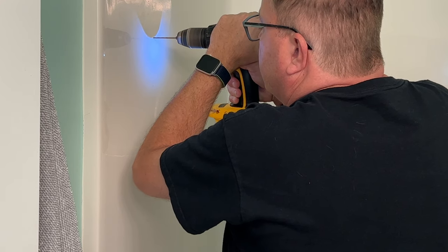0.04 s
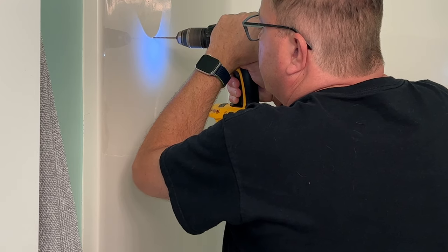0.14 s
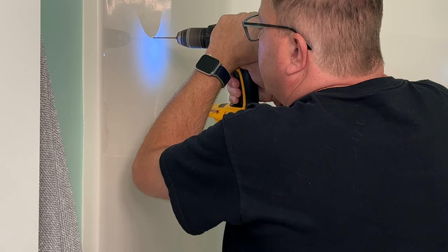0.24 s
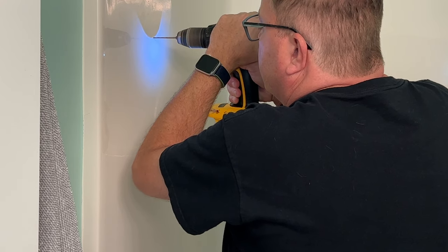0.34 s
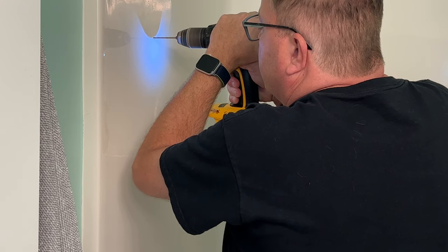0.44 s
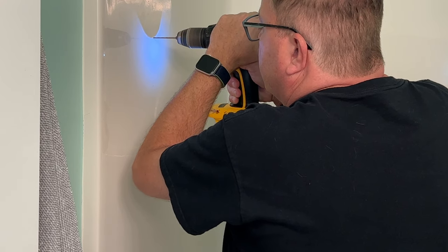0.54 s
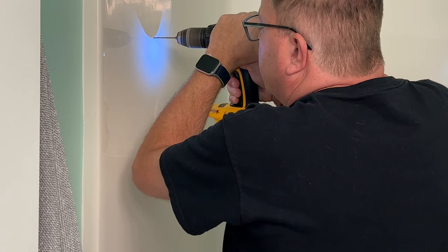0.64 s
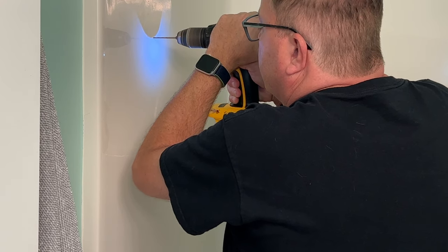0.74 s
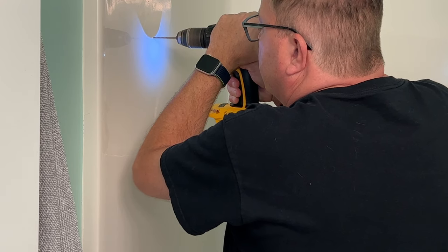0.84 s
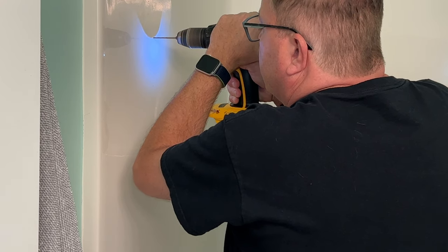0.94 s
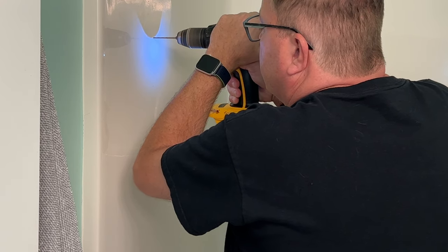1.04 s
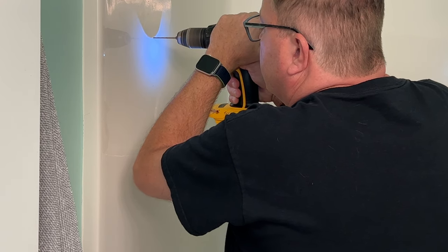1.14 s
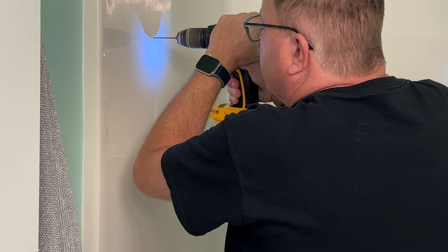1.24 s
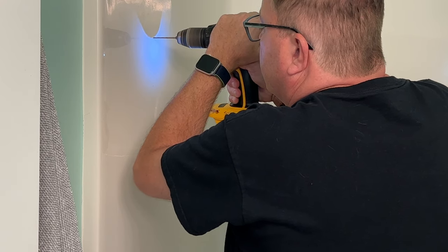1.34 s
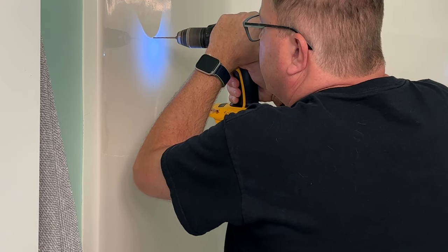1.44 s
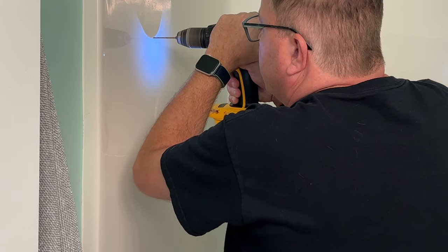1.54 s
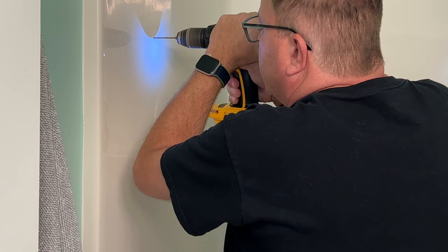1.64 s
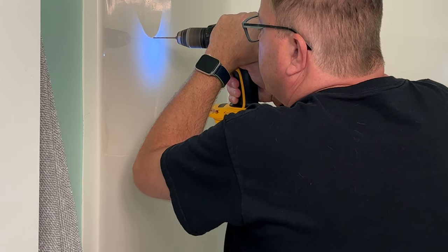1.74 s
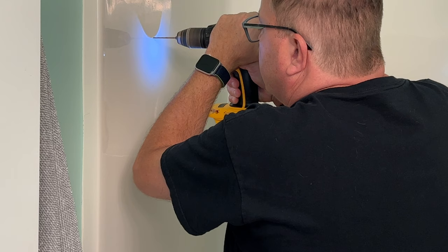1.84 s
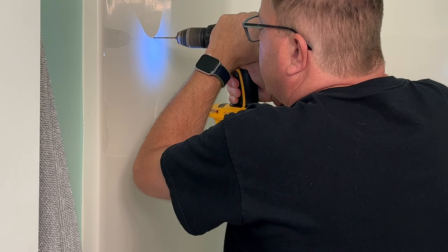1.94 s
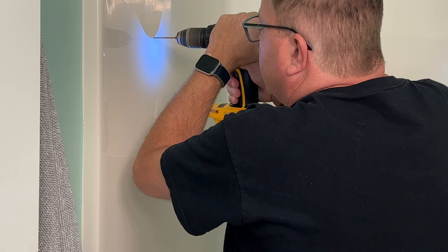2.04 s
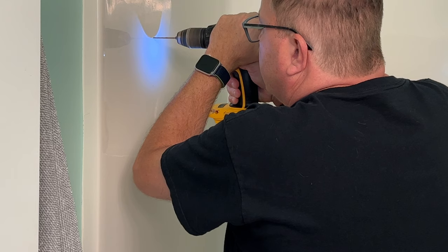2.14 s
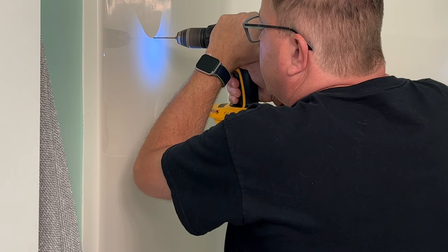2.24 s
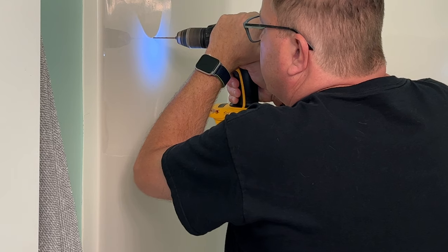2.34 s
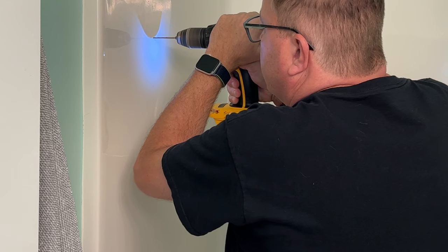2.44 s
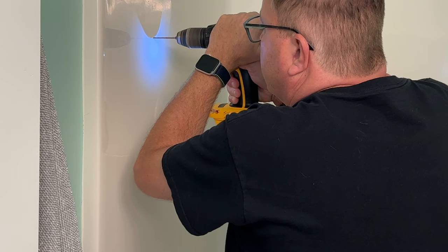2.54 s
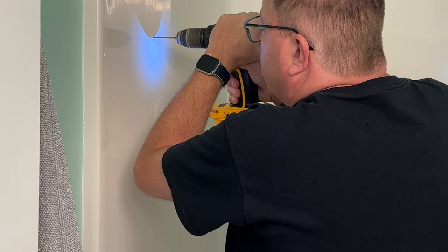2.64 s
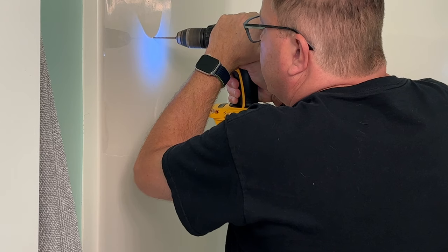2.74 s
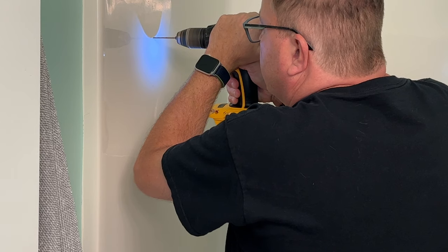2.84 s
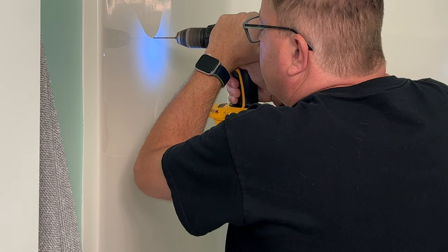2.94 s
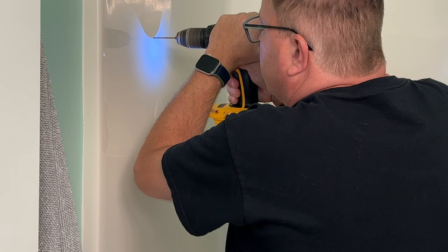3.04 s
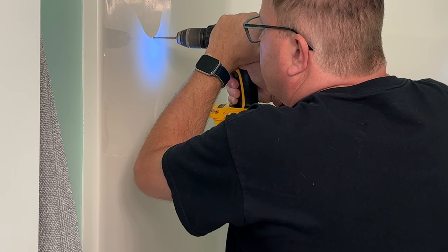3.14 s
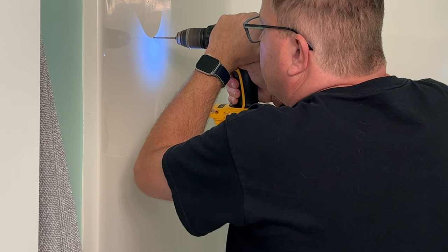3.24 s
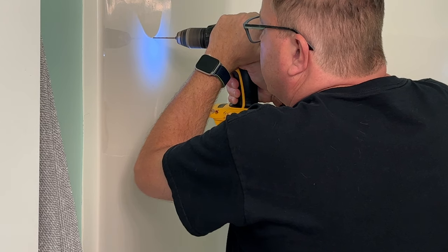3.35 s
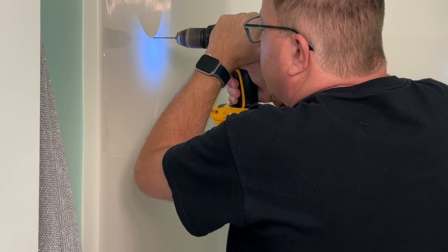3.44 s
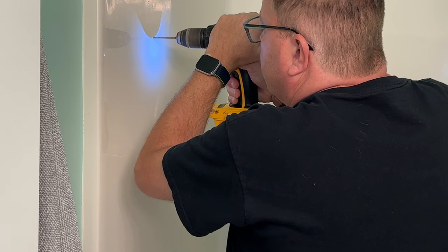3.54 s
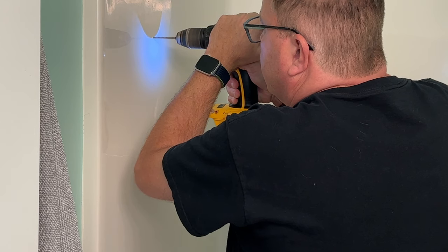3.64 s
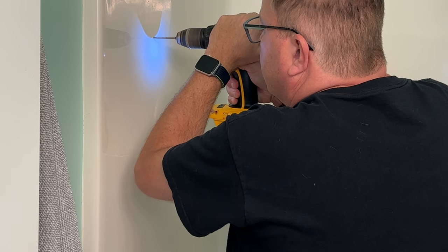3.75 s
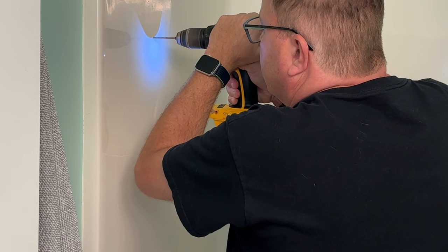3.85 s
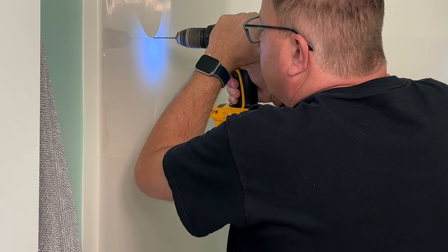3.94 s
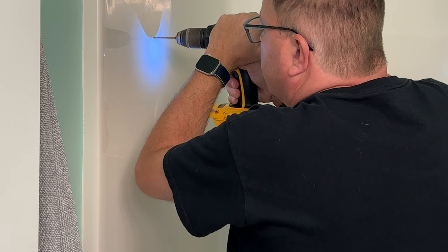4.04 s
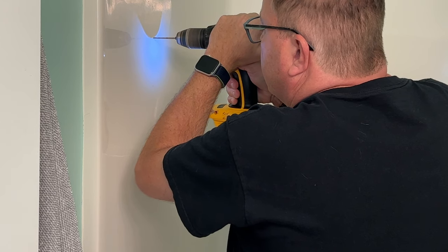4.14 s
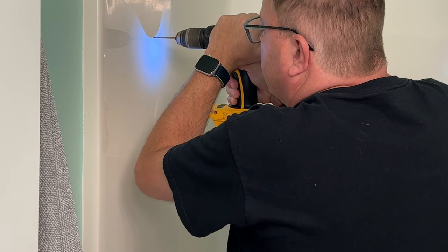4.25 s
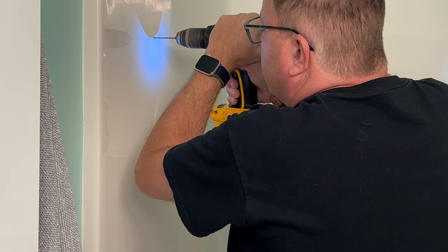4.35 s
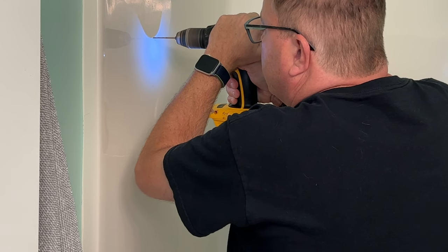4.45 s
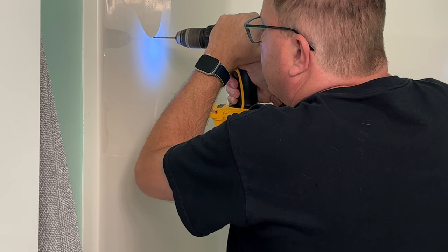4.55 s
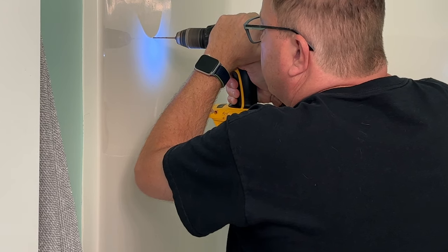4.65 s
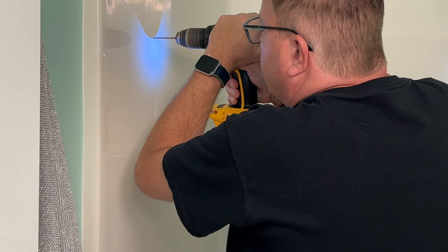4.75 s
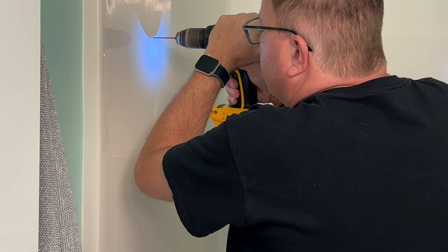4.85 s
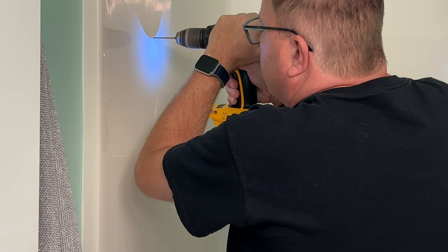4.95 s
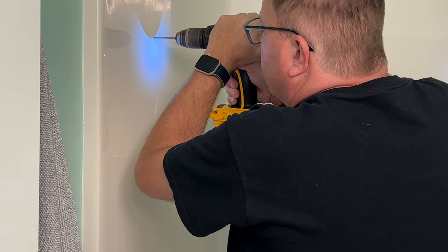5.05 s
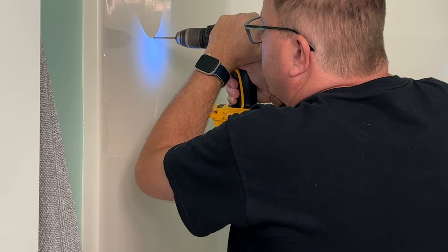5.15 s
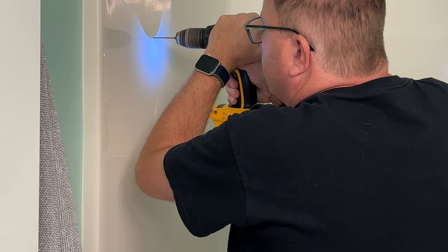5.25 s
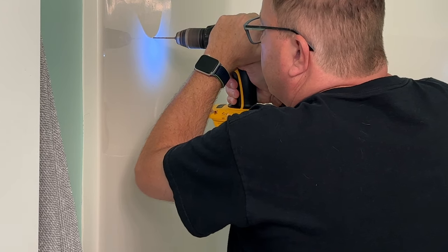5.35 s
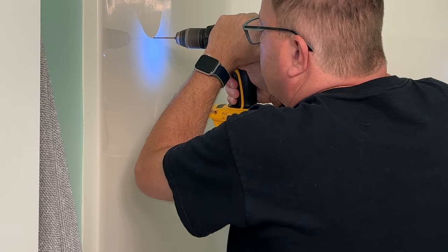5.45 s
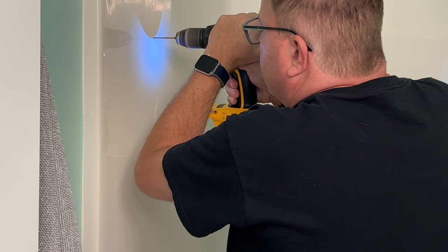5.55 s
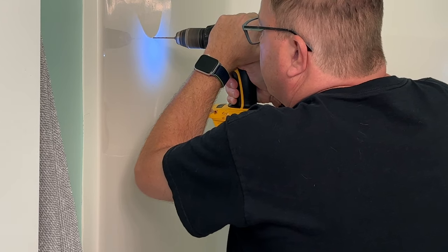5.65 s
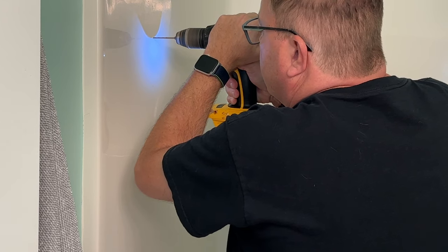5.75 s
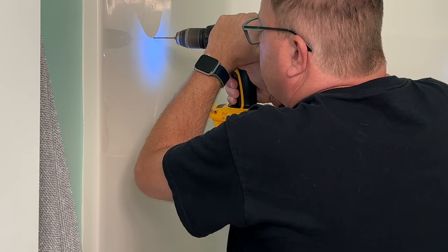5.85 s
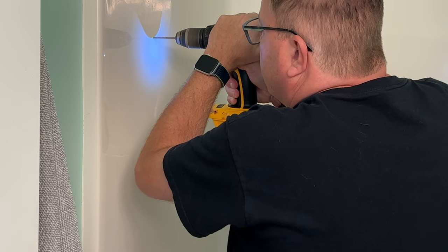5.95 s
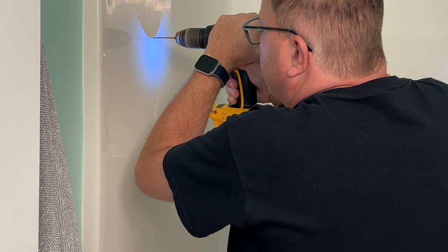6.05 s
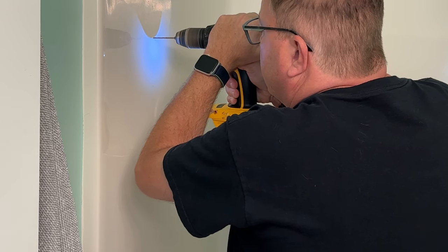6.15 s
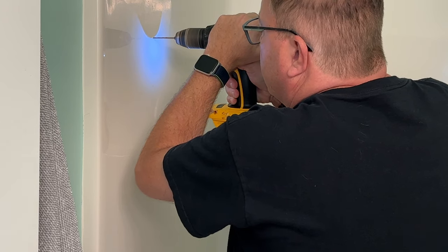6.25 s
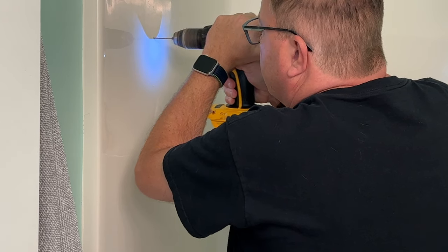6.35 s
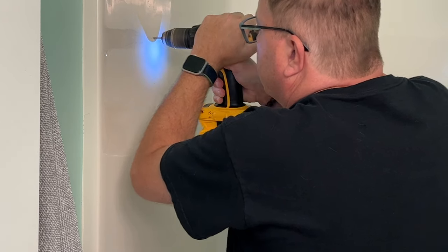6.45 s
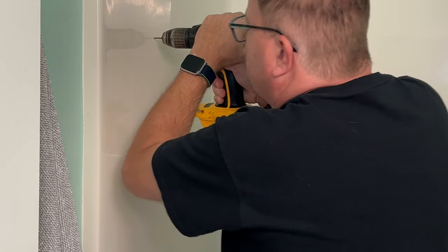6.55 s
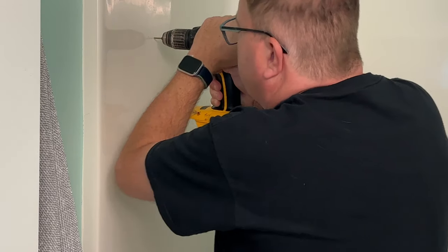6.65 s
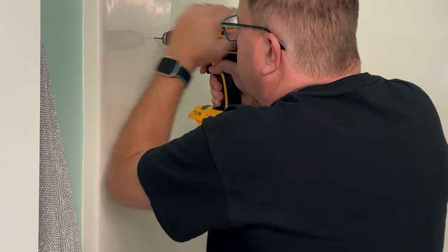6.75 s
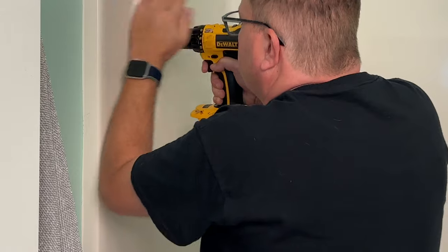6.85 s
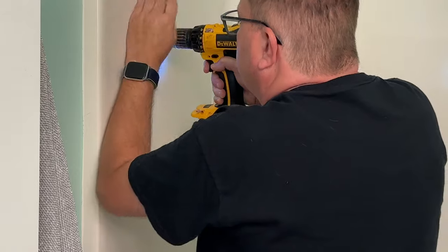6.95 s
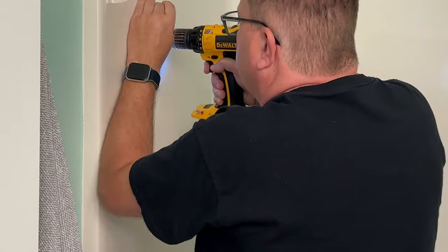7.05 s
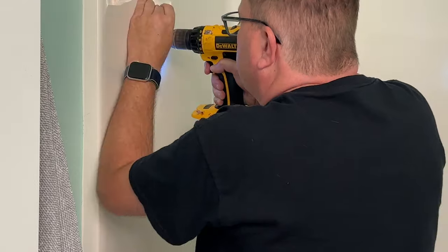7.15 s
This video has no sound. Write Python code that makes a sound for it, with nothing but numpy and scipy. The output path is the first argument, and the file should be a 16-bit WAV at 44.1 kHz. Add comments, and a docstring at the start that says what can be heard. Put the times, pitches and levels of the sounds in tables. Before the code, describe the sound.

A drill already at full speed bores into a thin wall panel: bright gear whine, beating overtones, low shaft hum and chattering noise. The loud start settles into a quieter steady drone with small regular pitch sags. Then come a rumbling breakthrough, rapid spin-down, dull hollow knocks, a faint hum in the gap and a brief restart. Close stereo pickup, short indoor reverberation.

```python
"""A whining cordless drill bores into a fibreglass shower wall, then breaks through and is braked to a stop.
A hand bumps the panel, the trigger starts the drill again, and a fan-like hum stays in the room.
Gears and shaft are sines locked to the turning planet carrier; motor hiss, rasp and rumble are shaped noise.
Knocks ring the panel's modes, ticks are short puffs of noise, and the hard-walled stall adds a tail."""
import sys
import numpy as np
from scipy import signal
from scipy.fft import rfft, irfft
from scipy.io import wavfile
from scipy.ndimage import uniform_filter1d

SR = 44100
rng = np.random.default_rng(int(sys.argv[2]) if len(sys.argv) > 2 else 0)


def unload_wav(signal):
    """Save mono or channel-first audio to the path in sys.argv[1] as 16-bit WAV at rate SR, clipped to [-1, 1]."""
    wavfile.write(
        sys.argv[1],
        SR,
        np.round(np.clip(np.atleast_2d(signal).T, -1, 1) * 32767).astype(np.int16),
    )


N = 317961

MESH_ORDER = 55   # teeth met in one turn of the planet carrier
# ringing modes of the wall panel: pitch_hz, relative level_db, t60_s (time to fade by 60 dB)
PANEL_MODES = [(94.8, -2, 0.31), (126.8, -13.5, 0.74), (172.6, -1.5, 0.2), (227.2, 0.5, 0.17),
               (274, -2, 0.081), (357.6, -5, 0.072), (405.7, -1.5, 0.12)]


def from_db(db):
    """Gain of a level in dB."""
    return 10 ** (np.asarray(db) / 20)


def rms_one(x):
    """Scaled to rms 1."""
    return x / np.sqrt(np.mean(x ** 2) + 1e-20)


def in_time(rows):
    """Each column of a table as a curve over all samples; the first column is the time."""
    s, *columns = np.transpose(rows)
    return [np.interp(np.arange(N) / SR, s, c) for c in columns]


def over_hz(rows):
    """Each column of a table on the bins of the spectrum, straight on a log axis."""
    hz, *columns = np.transpose(rows)
    bins_hz = np.arange(N // 2 + 1) * SR / N
    return [np.interp(np.log(bins_hz + 1), np.log(hz), c) for c in columns]


def coloured(spectrum):
    """Noise with the shape of the given spectrum, rms 1."""
    white = rfft(rng.standard_normal(N))
    return rms_one(irfft(white * from_db(over_hz(spectrum)[0]), N))


def drift(rate_hz):
    """Slow random wandering, rms 1: smoothed noise drawn every 40 samples."""
    r = np.exp(-80 * np.pi * rate_hz / SR)
    draws = rng.standard_normal(N // 40 + 2002)
    slow = signal.lfilter([1], [1, -2 * r, r * r], draws)[2000:]
    return np.interp(np.arange(N) / 40, np.arange(len(slow)), rms_one(slow))


def ring(x, hz, t60_s):
    """A mode as a two-pole resonance: a unit click sets a dying sine of height 1 ringing."""
    r = from_db(-60 / (t60_s * SR))
    w = 2 * np.pi * hz / SR
    return signal.lfilter([0, np.sin(w)], [1, -2 * r * np.cos(w), r * r], x + 1e-18)


def tones(turns, depth, orders, levels, waver_db, rate_hz, step, free=0):
    """Sines locked to the carrier, each wavering in level; those whole steps from the mesh beat with it."""
    out = np.zeros(N)
    for order, (shallow_db, deep_db) in zip(orders, levels):
        # a quarter cycle apart, side tones shake the pitch of the mesh instead of its level
        lead = 0 if (order - MESH_ORDER) % step == 0 else .25
        # and they come and go more freely
        freedom = 1 + 6 * lead
        swing_db = waver_db * freedom * drift(rate_hz * freedom)
        # running free in the hole, the side tones fade by 10 dB
        thinning_db = (order != MESH_ORDER) * 10 * free ** (1 if lead else 6)
        gain = from_db(shallow_db + (deep_db - shallow_db) * depth + swing_db - thinning_db)
        start_turns = lead + .06 * rng.standard_normal()
        out += gain * np.sin(2 * np.pi * (order * turns + start_turns))
    return np.sqrt(2) * out


def drill():
    """One drill: tones and noises share the same turning carrier, level curves and motor speed."""
    # the tone pattern shifts as the bit sinks in: time_s, depth (0-1)
    depth_rows = [(0, 0), (.7, 0), (.95, .7), (1.7, .7), (2.8, 1)]
    depth = in_time(depth_rows)[0]
    free_s, free_ramp_s = 6.42, .1   # start of free running in the hole
    free = np.clip((np.arange(N) / SR - free_s) / free_ramp_s, 0, 1)

    mesh_hz, levels = controls()
    rumble_db, hiss_db = levels[4:]
    turns, sag_hz, slack = carrier_turning(mesh_hz)
    tonal = gear_and_shaft_tones(turns, depth, free, sag_hz, slack, levels) + bit_squeal(hiss_db)
    noisy = motor_and_housing_noise(turns, depth, free, slack, levels) + panel_rumble(rumble_db)
    return tonal, noisy


def controls():
    """Mesh pitch and the level of each layer, from level curves, breakthrough, brake and new start."""
    # levels over time: time_s, whine_db (gear whine), body_db (rest of the drill)
    level_curves = [(0, 0, 2), (.68, 0, -1), (1.25, 1, -5), (1.73, -0.5, -7), (1.8, -7.5, -8),
                    (2.4, -6.5, -9.5), (2.75, -9.5, -10), (3.4, -13, -12.5), (4.3, -12.5, -13.5),
                    (4.85, -12, -10.5), (5.87, -14, -15), (6.2, -12.5, -13.5), (6.5, -9, -11)]
    # level law of mesh, shaft hum, second gear stage, mesh overtones, panel rumble and motor hiss:
    # start_db, share of whine_db, share of body_db, breakthrough_db, power of speed,
    # braking_db, free_running_db, run_up_torque_db
    layers = [(-25, 1, 0.0063, -6, 2.8, 1.5, -41, 24), (-33.5, 0.36, 0.38, -11, 4.5, -4.5, -58, 8),
              (-33, 0.054, 1.217, -11, 2.1, -11, -58, -2), (-40.5, 0.15, 0.66, 0, 1.46, -10, -48.5, 28.5),
              (-43.5, 0.06, 0.97, 10.5, 4.2, 14, -47.5, 19.5), (-42, 0.046, 0.44, 1.5, 1.67, 6.5, -40, 2)]
    # pitch of the tooth mesh before brake and run-up scale it: time_s, mesh_hz
    full_speed = [(0, 2887), (.7, 2889), (1.3, 2897), (2.75, 2902), (4.3, 2901), (4.8, 2895), (5.5, 2899),
                  (6.2, 2900), (6.39, 2874), (6.45, 2885), (6.505, 2880), (6.525, 2795)]
    breakthrough_s, breakthrough_width_s = 6.405, 0.066
    brake_s, brake_fall_s, brake_bite_s = 6.54, 0.071, 0.017
    restart_s, run_up_s = 7.085, .065

    t = np.arange(N) / SR
    braked_s, again = np.maximum(t - brake_s, 0), t > restart_s
    slowing = np.exp(-(braked_s / brake_fall_s) ** 2)
    speed = np.where(again, np.tanh((t - restart_s) / run_up_s), slowing)
    speed = np.maximum(speed, 1e-4)
    whine_db, body_db = in_time(level_curves)
    through = np.exp(-((t - breakthrough_s) / breakthrough_width_s) ** 2)
    bite = np.minimum(braked_s / brake_bite_s, 1)
    torque = 1 - speed ** 2

    levels = []
    for start_db, whine, body, through_db, power, braking_db, free_db, torque_db in layers:
        first_run_db = start_db + whine * whine_db + body * body_db + through_db * through + braking_db * bite
        restarted_db = free_db + torque_db * torque
        levels.append(power * 20 * np.log10(speed) + np.where(again, restarted_db, first_run_db))
    return in_time(full_speed)[0] * speed, levels


def carrier_turning(mesh_hz):
    """Turns of the planet carrier, added up from its speed, with the sag and slack that disturb it."""
    # about once a second the speed sags at once and climbs back: time_s, sag_hz (of the mesh)
    sags = [(.72, 24), (1.76, 25), (2.8, 28), (3.84, 26), (4.88, 24), (5.91, 20)]
    recovery_s = .24
    t = np.arange(N) / SR
    sag_hz = sum(hz * (t > s) * np.exp(-np.abs(t - s) / recovery_s) for s, hz in sags)
    sag_hz = uniform_filter1d(sag_hz, size=900)   # soften the onsets
    # away from full speed the gears run slack and the pitch shakes
    slack = np.clip(3 * (1 - mesh_hz / 2860), 0, 1)
    shaken_hz = (mesh_hz - sag_hz) * (1 + .14 * slack * drift(250.0))
    return np.cumsum(shaken_hz) / SR / MESH_ORDER, sag_hz, slack


def gear_and_shaft_tones(turns, depth, free, sag_hz, slack, levels):
    """Meshing teeth and the turning shaft sound at fixed multiples (orders) of the carrier's turning rate."""
    # each order list: multiples of the carrier's turning rate
    # each level list, one row per order: shallow_db, deep_db (under the layer)
    mesh_orders, mesh_tone_db = [46.25, 47.625, 49, 50, 50.625, 51, 52, 53, 53.625, 54, 55, 56, 56.375, 57,
                                 58, 58.375, 59.375, 61.25], [(-34, -30), (-34, -30), (-23, -25), (-25, -24),
                                                      (-18, -26), (-22, -14), (-7, -5.5), (-11, -17),
                                                      (-30, -22), (-17, -28), (0, 0), (-16, -19),
                                                      (-24, -16), (-16, -14), (-8, -14), (-23, -27),
                                                      (-18, -38), (-24, -24)]
    overtone_orders, overtone_tone_db = [104, 106, 106.375, 107, 108, 109, 110, 111, 112], [(-30, -11), (-10.5, -6), (-11.5, -19.5),
                                                                  (-3.5, -18), (-1, -13), (-11, -5.5),
                                                                  (-7.5, -8.5), (-8, -15), (-12, -13)]
    high_orders, high_tone_db = [30.625, 158, 159, 161, 213, 219], [(-15.5, -12), (-11, -6.5), (-7, -5.5), (-12, -6.5),
                                                      (-11, -10), (-5, -13.5)]
    low_orders, low_tone_db = [4.375, 1.85, 8.75, 9.74, 10.36, 11.15], [(4, 0.5), (-31.5, -22), (-21.5, -21.5), (-19, -23.5),
                                                   (-18, -24), (-14, -24.5)]
    # narrow resonances that lift an overtone passing through: pitch_hz, width_hz
    casing = [(5590, 22), (5700, 60), (5808, 34)]
    stage_two_order = 13.79
    mesh_db, shaft_db, stage_db, overtone_db, _, hiss_db = levels

    gears = tones(turns, depth, mesh_orders, mesh_tone_db, waver_db=.8, rate_hz=4.0, step=3, free=free)
    overtones = tones(turns, depth, overtone_orders, overtone_tone_db, waver_db=1.6, rate_hz=7.0, step=1)
    lifted = sum(signal.lfilter(*signal.iirpeak(hz, hz / width_hz, SR), overtones) for hz, width_hz in casing)
    overtones = (1 - 0.59 * depth) * overtones + depth * lifted
    high = tones(turns, depth, high_orders, high_tone_db, waver_db=.6, rate_hz=8.0, step=3)
    # the first low tone is steadier than the rest
    shaft = tones(turns, depth, low_orders[:1], low_tone_db[:1], waver_db=.35, rate_hz=3.0, step=3)
    shaft += tones(turns, depth, low_orders[1:], low_tone_db[1:], waver_db=1.2, rate_hz=1.5, step=3)
    stage = np.sqrt(2) * np.sin(2 * np.pi * stage_two_order * turns)

    # a sag unloads the first stage for a moment and loads the second; slack gears lose their fine tones
    unloading_db = 3.5e-4 * sag_hz ** 3
    out = from_db(mesh_db - unloading_db - 11.4 * slack) * gears
    out += from_db(overtone_db + 0.041 * sag_hz - 20 * slack) * overtones
    out += from_db(hiss_db - 40 * slack - 6 * free) * high
    out += from_db(shaft_db - 0.047 * sag_hz) * shaft
    out += from_db(stage_db - 5.5 + 0.18 * sag_hz) * stage
    return out


def motor_and_housing_noise(turns, depth, free, slack, levels):
    """Motor hiss pulsed by the planets, gear rasp, and housing chatter with short bursts."""
    # shape of the motor hiss: pitch_hz, relative level_db (per Hz)
    hiss_shape = [(400, -46.5), (700, -15.5), (2100, -19), (2800, -1.5), (3500, -12.5), (5800, -13),
                  (8000, -18), (9000, -13), (10000, -31.5), (11300, -22), (14000, -28.5), (15600, -35)]
    # the housing chatters in short bursts, while boring and once in the run-up:
    # time_s, level_db (over the hiss control level)
    burst_rows = [(.12, 1.5), (.175, 3.5), (.25, -2), (.33, -1), (0.546, 2), (.702, 6), (.783, 2),
                  (1.16, 2.5), (7.158, -4)]
    burst_width_s = .016
    mesh_db, _, _, overtone_db, _, hiss_db = levels
    low_rasp, chatter, high_rasp = housing()

    # three planets pass a point each turn and pulse the noise
    planets = 1 + 0.062 * np.sin(2 * np.pi * 3 * turns)
    out = from_db(hiss_db + 6.0 + 0.84 * drift(15.0)) * coloured(hiss_shape) * planets
    # slack gears rasp more
    out += from_db(mesh_db - 15 + 5 * slack - 3 * free) * low_rasp
    out += from_db(overtone_db - 8 + 7 * slack) * high_rasp
    t = np.arange(N) / SR
    bursts = sum(from_db(db) * np.exp(-((t - s) / burst_width_s) ** 2) for s, db in burst_rows)
    steady_chatter = from_db(-5 - 5.1 * depth + 2.8 * slack + 3.0 * drift(36.0))
    return out + from_db(hiss_db) * (bursts + steady_chatter) * chatter


def housing():
    """Noise in each resonance of the gear housing, rms 1."""
    # resonances from low to high: pitch_hz, width_hz (of one of the two filter passes)
    resonances = [(2870, 320), (3940, 300), (5850, 800)]
    out = []
    for hz, width_hz in resonances:
        band = signal.butter(1, [hz - width_hz / 2, hz + width_hz / 2], "band", fs=SR, output="sos")
        once = signal.sosfilt(band, rng.standard_normal(N))
        out.append(rms_one(signal.sosfilt(band, once)))
    return out


def bit_squeal(hiss_db):
    """The bit squeals in spells: a sine of slightly unsteady pitch, following the hiss level."""
    # spells: start_s, end_s, level_db (over the hiss control level)
    squeals = [(0.048, 0.19, 5.5), (0.232, 0.51, 1), (.53, 0.66, -2.5), (1.13, 1.28, -4.5),
               (1.32, 4.7, -5.5), (6.32, 6.42, -2)]
    squeal_hz = 4373
    t = np.arange(N) / SR
    spells = sum(from_db(db) * ((t > start_s) & (t < end_s)) for start_s, end_s, db in squeals)
    spells = uniform_filter1d(spells, size=900)   # soften the edges
    squeal = np.sin(2 * np.pi * squeal_hz * np.cumsum(1 + 6e-4 * drift(20.0)) / SR)
    return from_db(hiss_db + 3.2 * drift(15.0)) * spells * squeal


def panel_rumble(rumble_db):
    """The bit scrapes as low noise, which also sets the panel's modes ringing."""
    # shape of the scrape: pitch_hz, relative level_db (per Hz)
    rumble_shape = [(25, -24), (75, -9.5), (170, -3), (300, -4), (420, 2.5), (590, 0.5), (650, -22.5),
                    (900, -28), (1500, -76.5)]
    scrape = coloured(rumble_shape)
    ringing = rms_one(sum(from_db(db) * ring(scrape, hz, t60_s) for hz, db, t60_s in PANEL_MODES))
    return from_db(rumble_db) * (scrape + from_db(-4.0) * ringing)


def knocks():
    """Soft blows ring the panel's modes, most those near the pitch that the contact favours."""
    # blows on the panel: time_s, strength_db (before mode levels and filter), favoured_hz
    blows = [(6.335, -36, 253), (6.36, -26, 122.3), (6.378, -27.5, 113), (6.388, -31, 115),
             (6.46, -27, 117.6), (6.498, -39, 127.6), (6.586, -26.5, 370), (6.595, -27, 392),
             (6.609, -22, 321), (6.912, -28.5, 155.7), (6.939, -35.5, 191), (7.03, -52, 198)]
    out = np.zeros(N)
    for hz, level_db, t60_s in PANEL_MODES:
        clicks = np.zeros(N)
        for s, db, favoured_hz in blows:
            mismatch = hz / favoured_hz - favoured_hz / hz
            clicks[round(s * SR)] = from_db(db + level_db) / (1 + 5.7 * mismatch ** 2)
        out += ring(clicks, hz, t60_s)
    return signal.sosfilt(signal.butter(4, [70, 480], "band", fs=SR, output="sos"), out)


def ticks():
    """Ticks, scuffs and clatter of bit, brake, hand and trigger: short dying puffs of noise in a band."""
    # puffs: start_s, level_db (rms before fading), pitch_hz, width_hz, t60_s (time to fade by 60 dB)
    puffs = [(6.33, -47, 750, 700, .25), (6.558, -40, 2700, 300, .06), (6.572, -35, 2350, 350, .09),
             (6.562, -41, 1400, 1600, .22), (6.59, -47, 3200, 3600, .2), (6.753, -46, 7950, 400, .055),
             (6.885, -72, 7000, 2000, .1), (6.972, -54, 5700, 1100, .15), (7.079, -64, 3700, 400, .025),
             (7.079, -65, 5700, 400, .025), (7.079, -62, 7100, 700, .025)]
    out = np.zeros(N)
    t = np.arange(SR // 8) / SR
    for s, db, hz, width_hz, t60_s in puffs:
        band = signal.butter(3, [hz - width_hz / 2, hz + width_hz / 2], "band", fs=SR, output="sos")
        noise = rms_one(signal.sosfilt(band, rng.standard_normal(len(t))))
        out[round(s * SR):][:len(t)] += noise * from_db(db - 60 * t / t60_s)
    return out


def stall(tonal, noisy):
    """The hard-walled stall: a soft-topped tail common to both ports, and a duller noise tail that differs."""
    t60_s, common_db, dull_cut_hz, soft_cut_hz = 0.52, -12, 1300, 3500
    t = np.arange(SR // 2) / SR
    # a tail is fading noise that starts 4 ms after the direct sound
    tails = rng.standard_normal((2, len(t))) * from_db(-60 * t / t60_s) * (t > .004)
    tails /= np.sqrt(np.sum(tails[0] ** 2))
    tails[1] = signal.sosfilt(signal.butter(4, dull_cut_hz, fs=SR, output="sos"), tails[1])
    tails[0] = signal.sosfilt(signal.butter(1, soft_cut_hz, fs=SR, output="sos"), tails[0])
    sent = np.array([.5 * tonal + noisy, noisy])
    common, apart = signal.fftconvolve(sent, tails, axes=1)[:, :N]
    return tonal + noisy + from_db(common_db) * common, apart


def background():
    """A steady hum of sines over dull room noise, part of it opposite in the two channels."""
    # hum tones: pitch_hz, level_db (rms)
    hum_tones = [(131, -69), (393, -77), (523, -71), (785, -84), (982, -85), (1179, -82)]
    # shape of the room noise: pitch_hz, relative level_db (per Hz)
    floor_shape = [(30, -26), (120, 0), (300, -8), (700, -24), (3000, -28), (8000, -48), (15000, -65)]
    floor_db = -68   # of the part common to both channels
    t = np.arange(N) / SR
    hum = sum(from_db(db) * np.sqrt(2) * np.sin(2 * np.pi * (hz * t + rng.random())) for hz, db in hum_tones)
    opposite = .4 * coloured(floor_shape) * np.array([[1], [-1]])
    return hum + from_db(floor_db) * (coloured(floor_shape) + opposite)


def scene():
    """All sources in the stall, heard at two microphone ports that differ in phase and level by pitch."""
    # the ports, opposite in phase around 10 kHz:
    # pitch_hz, left_lead (half turns), left_minus_right_db
    port_rows = [(30, 0, 0), (100, 0, 2.5), (230, .05, -3.7), (400, 0, .5), (730, .22, -.5), (1120, -.2, 0),
                 (1800, .15, .5), (3000, .17, -.2), (3500, .04, 0), (8200, 0, 0), (8400, -.45, 0),
                 (8950, -.55, 0), (9150, -1, 0), (10600, -1, 0), (10850, -1.4, 0), (11900, -1.55, 0),
                 (12400, -2, 0)]
    tonal, noisy = drill()
    near, apart = stall(tonal, noisy + knocks() + ticks())
    half_turns, balance_db = over_hz(port_rows)
    # each port takes half of the difference
    lead = np.exp(.5j * np.pi * half_turns) * from_db(balance_db / 2)
    ports = irfft(rfft(near) * np.array([lead, 1 / lead]), N)
    return ports + from_db(-8.0) * apart * [[1], [-1]] + background()


def record(dry):
    """A steep low-pass filter cuts the top above 15650 Hz."""
    return signal.sosfilt(signal.ellip(10, .5, 70, 15650, fs=SR, output="sos"), dry)


dry = scene()
out = record(dry)
unload_wav(out)
```